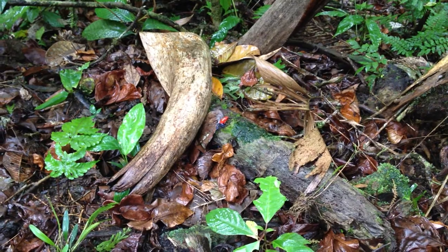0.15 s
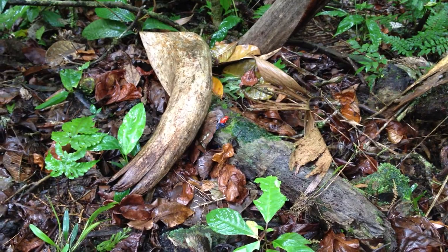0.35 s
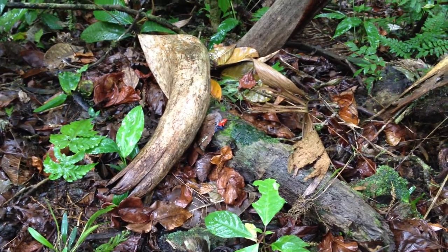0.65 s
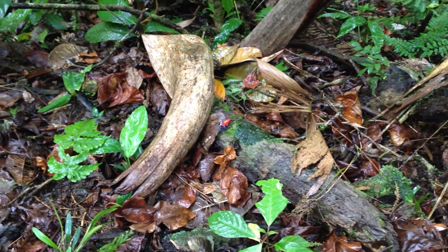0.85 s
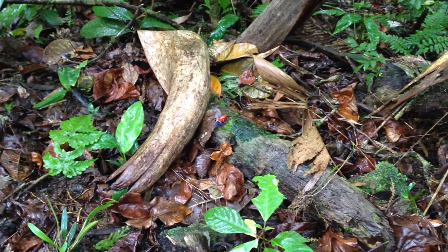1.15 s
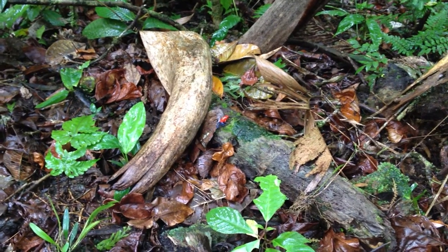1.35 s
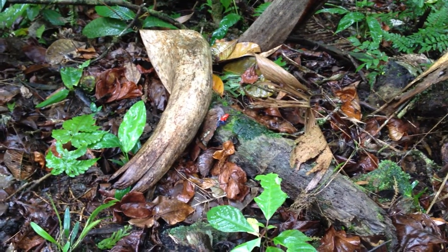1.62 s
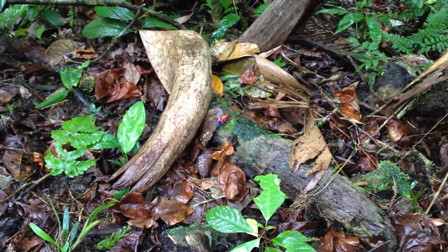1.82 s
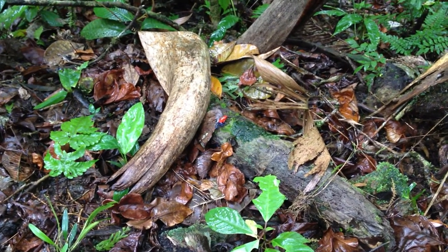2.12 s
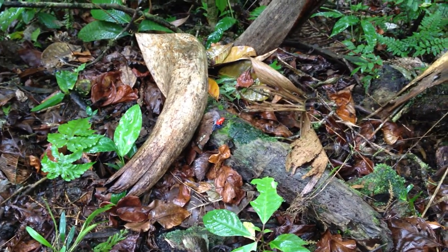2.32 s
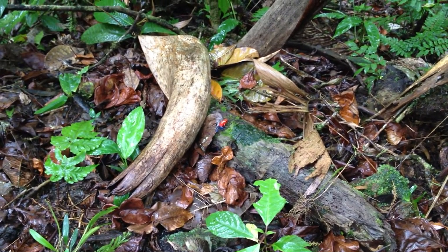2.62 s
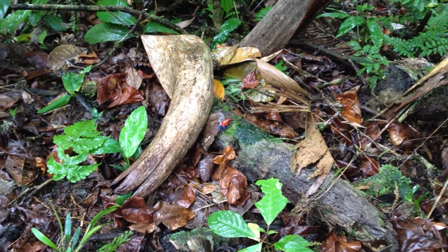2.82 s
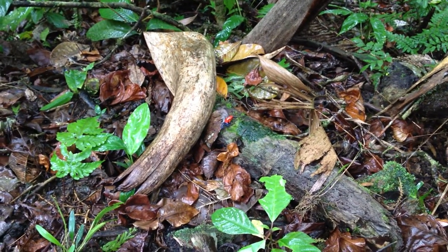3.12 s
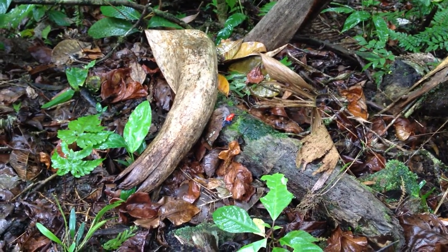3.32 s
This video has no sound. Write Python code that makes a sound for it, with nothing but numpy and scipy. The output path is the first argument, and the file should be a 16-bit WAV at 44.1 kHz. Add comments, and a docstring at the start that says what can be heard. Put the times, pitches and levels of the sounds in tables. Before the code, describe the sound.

A small frog calls in short, high buzzy chirps, about five a second, over watery forest hiss.

```python
"""A small frog calls five times a second from the litter of a wet forest: each call is a swelling
buzz of pulses that ring its vocal sac, coloured by a hollow and followed by diffuse echoes.
Drops tap on near leaves, tick in the litter and pat on soft ground as decaying modes and noise;
fainter drops fall throughout. Shaped noise gives a steady watery hiss and thin insect bands."""
import sys
import numpy as np
from scipy import signal
from scipy.fft import rfft, irfft, next_fast_len
from scipy.io import wavfile
from scipy.ndimage import uniform_filter1d, map_coordinates

SR = 44100
rng = np.random.default_rng(int(sys.argv[2]) if len(sys.argv) > 2 else 0)


def to_wav(sig):
    """Store sig (one row per channel, or 1-D mono) as 16-bit WAV at the path in sys.argv[1].

    Samples outside -1..1 are clipped; the rate is SR.
    """
    pcm = np.clip(np.atleast_2d(sig), -1, 1) * 32767
    pcm = np.round(pcm).astype(np.int16)
    wavfile.write(sys.argv[1], SR, pcm.T)  # frames by channels


N = 152586
TOP_HZ = 15420  # upper limit of the whole sound
DROP_TIME = np.arange(SR // 4) / SR  # seconds since a near drop lands
DRIP_ROOM_DB = -7  # echoes of a near drop, relative to its direct sound
BURST_WIDTH_HZ = 12000  # bandwidth of a droplet's tick and of a leaf's crack


def amp(db):
    """Level law: decibels to amplitude gain."""
    return 10 ** (np.asarray(db) / 20)


def unit(x):
    """Power normalisation: scaled to rms 1."""
    return x / np.sqrt(np.mean(x ** 2) + 1e-20)


def along(points, hz):
    """Spectral envelope: (Hz, value) points joined along a logarithmic frequency axis."""
    f, v = np.transpose(points)
    return np.interp(np.log(hz + 1), np.log(f + 1), v)


def filtered(x, response):
    """Linear filtering: the spectrum of x times a complex response of frequency."""
    m = next_fast_len(len(x) + SR // 10)
    hz = np.fft.rfftfreq(m, 1 / SR)
    return irfft(rfft(x, m) * response(hz), m)[:len(x)]


def resonance(f, hz, width):
    """Damped oscillator: response of one causal resonance, 1 at its peak."""
    return 1j * f * width / (hz * hz - f * f + 1j * f * width)


def resonances(f, modes):
    """Modal superposition: resonances (Hz, width Hz, dB) sum in parallel."""
    return sum(amp(db) * resonance(f, hz, width) for hz, width, db in modes)


def band(hz, width, size):
    """Narrow-band noise: rms 1, through two equal resonances in cascade for steep skirts."""
    noise = rng.standard_normal(size)
    return unit(filtered(noise, lambda f: resonance(f, hz, width * np.sqrt(2)) ** 2))


def low_cut(x, hz, order=2):
    """High-pass filtering: a causal Butterworth cut of the bass."""
    return signal.sosfilt(signal.butter(order, hz, "highpass", fs=SR, output="sos"), x)


def add(track, s, sound):
    """Linear superposition: mix a sound into the track from time s."""
    i = max(round(s * SR), 0)
    part = track[i:i + len(sound)]
    part += sound[:len(part)]


def echoes(x):
    """Diffuse reverberation: convolution with noise of unit energy, decaying by frequency."""
    # Each row: frequency in Hz, time for a 60 dB decay in seconds.
    forest_decay = [(200, 0.057), (4000, 0.076), (12000, 0.1)]
    hz, t, z = signal.stft(rng.standard_normal(SR // 2), SR, nperseg=256)
    decay = amp(-60 * t / along(forest_decay, hz)[:, None])
    tail = signal.istft(z * decay, SR, nperseg=256)[1]
    return signal.fftconvolve(x, tail / np.linalg.norm(tail))[:len(x)]


def dying(t, t60):
    """Exponential damping: a fall of 60 dB in t60 seconds."""
    return np.exp(-np.log(1000) * t / t60)


def ring(modes, hz):
    """Modal ringing: damped sines (multiple of hz, dB, t60 s), struck together."""
    t = DROP_TIME
    return sum(amp(db) * np.sin(2 * np.pi * k * hz * t) * dying(t, t60) for k, db, t60 in modes)


def later(x, delay):
    """Pure delay: a drop's signal shifted by some seconds."""
    return np.interp(DROP_TIME - delay, DROP_TIME, x, left=0)


def wet(x):
    """Direct and reverberant field: a near drop with its echoes."""
    return x + amp(DRIP_ROOM_DB) * echoes(x)


def hiss(level_db=-49, patchy_db=0.9, waver_db=0.15, waver_rate=7):
    """Distant water as shaped random noise, with slight patches in time and pitch and a slight waver."""
    # Each row: frequency in Hz, relative spectral level in dB.
    water_colour = [(25, -32), (60, -32), (90, -18.5), (125, -7.5), (190, -2), (320, 0.5), (480, -0.5),
                    (900, 1.5), (1700, 0), (2500, -4.5), (3400, -4.5), (4300, -3), (5100, -10.5),
                    (6800, -9.5), (8500, -11.5), (9400, -17), (12500, -16.5), (14000, -21.5),
                    (15400, -24.5)]
    z = signal.stft(rng.standard_normal(N), nperseg=512)[2]
    patches = uniform_filter1d(rng.standard_normal(z.shape), size=7, axis=0)
    patches = uniform_filter1d(patches, size=10, axis=1)
    noise = signal.istft(z * amp(patchy_db * unit(patches)), nperseg=512)[1][:N]
    # waver_rate: random points a second
    waver = map_coordinates(rng.standard_normal(200), [np.arange(N) * waver_rate / SR])
    water = unit(filtered(noise, lambda f: amp(along(water_colour, f))))
    return amp(level_db + waver_db * waver) * water


def insects():
    """Incoherent summation: a far chorus merges into thin steady bands of noise."""
    # Each row: centre in Hz, width in Hz, level in dB.
    chorus_bands = [(5956, 93, -66.5), (6242, 180, -66)]
    return sum(amp(db) * band(hz, width, N) for hz, width, db in chorus_bands)


def far_drops(centre_hz=5000, octaves=0.5, t60=0.01, count=400):
    """Poisson process: faint drops fall at random, each a decaying burst of noise."""
    rate, loudest_db, spread_db = 45, -49.5, 3  # drops a second, level at onset, range below it
    out, t = np.zeros(N), np.arange(SR // 20) / SR
    times = np.cumsum(rng.exponential(1 / rate, count))
    for s, far, colour in zip(times, rng.random(count), rng.standard_normal(count)):
        hz = min(centre_hz * 2 ** (octaves * colour), TOP_HZ)
        drop = band(hz, hz, len(t)) * dying(t, t60)
        add(out, s, amp(loudest_db - spread_db * far) * drop)
    return out


def frog(count=51):
    """Source and filter: swelling, quickening pulses, nearly in step with the sac's ring, excite its modes."""
    # Each row: loudest moment in seconds, level in dB before the common gain,
    # length as a multiple of the usual, ring pitch in Hz that sets the pulse timing.
    calls = [(.126, -44, 1.2, 4060), (.314, -45.5, 1.15, 4130), (.502, -45.5, 1.4, 4116),
             (.695, -45.5, 1.1, 4125), (0.883, -45.5, 1.4, 4055), (1.074, -45, 1.3, 4075),
             (1.258, -44.5, 1.05, 4065), (1.447, -44.5, 0.92, 4065), (1.63, -44, 1.1, 4030),
             (1.819, -44.4, 1.14, 4095), (2.009, -45.3, 1.3, 4130), (2.199, -46.5, 1, 4060),
             (2.384, -45, .8, 4060), (2.57, -44.5, 1.25, 4120), (2.758, -45.5, 1.1, 4137),
             (2.948, -45.6, 1.3, 4044), (3.135, -47, 1.2, 4070), (3.329, -45.5, 1.1, 4070)]
    # Vocal sac resonances. Each row: frequency in Hz, width in Hz, level in dB.
    sac_modes = [(4110, 200, 0), (4610, 170, -18), (3860, 110, -22)]
    # Colour of the voice. Each row: frequency in Hz, gain in dB.
    voice_colour = [(2500, 6.5), (3400, 1.5), (3900, 0), (4650, -0.5), (5100, -8), (6500, 0.5), (8200, -7),
                    (10000, -7)]
    # Hollow in the litter. Each row: frequency in Hz, width in Hz, level over the direct voice in dB.
    hollow_modes = [(3769, 22, 1), (3860, 40, -4), (3940, 20, 0), (4070, 22, -6), (4184, 24, -3),
                    (4238, 20, 1)]
    pulse_hz, pulse_rise_hz_per_s = 272, 900  # rate in mid-call and its quickening
    ring_rise_hz_per_s = 200  # rise of the ring pitch through a call
    drift, uneven = 0.03, 0.04  # share of the rate from call to call, share of the mean spacing
    jitter_s, scatter_db = 0.00004, 1  # spread of pulse timing and size
    swell_s, fade_s, swell_shape, fade_shape = 0.019, 0.016, 1.62, 1.05  # rounded rise, trailing fall
    gain_db, room_db = -4, -5  # common gain, echoes relative to the voice
    lead, early_s = 0.1, 0.004  # seconds of room before the loudest moment, further advance

    def body(f):
        """Sac and hollow act in cascade."""
        sac = amp(along(voice_colour, f)) * resonances(f, sac_modes)
        return sac * (1 + resonances(f, hollow_modes))

    out = np.zeros(N)
    for s, db, length, ring_hz in calls:
        index = np.arange(count) - count // 2 + rng.random() + uneven * rng.standard_normal(count)
        when = index / (pulse_hz * (1 + drift * rng.normal()))
        when = when - pulse_rise_hz_per_s / pulse_hz * when ** 2 / 2
        # pulses move to whole cycles of the rising ring, then jitter
        cycles = np.round(when * ring_hz)
        when = (cycles - ring_rise_hz_per_s * when ** 2 / 2) / ring_hz
        when = when + jitter_s * rng.standard_normal(count)

        rising = when < 0
        span = length * np.where(rising, swell_s, fade_s)
        effort = np.exp(-np.abs(when / span) ** np.where(rising, swell_shape, fade_shape) / 2)
        sizes = effort * amp(scatter_db * rng.standard_normal(count))

        # sinc interpolation places each pulse between samples
        at = (when + lead) * SR
        places = np.round(at).astype(int)[:, None] + np.arange(-8, 9)
        weights = sizes[:, None] * np.sinc(places - at[:, None])
        pulses = np.bincount(np.abs(places).ravel(), weights.ravel(), SR // 2)

        voice = filtered(pulses, body)
        call = unit(voice) + amp(room_db) * unit(echoes(voice))
        strength = np.sqrt(np.sum(call ** 2) / (SR / 10))  # energy as an rms over 0.1 s
        add(out, s - lead - early_s, amp(db + gain_db) * call / strength)
    return out


def litter_ticks():
    """Impulsive excitation: droplets in the litter give short decaying bursts of broad noise."""
    # Each row: start in seconds, onset level in dB before colouring, centre in Hz, 60 dB decay in seconds.
    droplets = [(0.28, -43.5, 7800, 0.03), (.3225, -45, 8000, .015), (.417, -43, 7500, 0.015),
                (0.7255, -43, 7960, 0.023), (1.112, -44, 8000, 0.048), (1.2005, -44, 13000, .025),
                (1.26, -43, 9000, .012), (1.6575, -46, 11000, .025), (1.722, -43, 9000, 0.024),
                (1.894, -46, 12500, 0.059), (2.291, -45, 11000, .025), (2.562, -46, 10600, 0.12),
                (2.696, -47, 8500, .02), (2.848, -40, 10000, 0.0087), (2.881, -39, 8000, .01),
                (3.138, -43, 11000, 0.028), (3.218, -37.5, 11000, 0.011)]
    # Each row: frequency in Hz, gain in dB.
    tick_colour = [(8000, -1.5), (12500, -4), (15400, -5)]
    out, t = np.zeros(N), DROP_TIME
    for s, db, hz, t60 in droplets:
        noise = band(hz, BURST_WIDTH_HZ, len(t))
        tick = filtered(noise, lambda f: amp(along(tick_colour, f)))
        add(out, s, amp(db) * wet(tick * dying(t, t60)))
    return out


def ground_pats():
    """Damped impact: drops on soft ground give noise, a low thump and the knock of a sodden leaf."""
    # Each row: start in seconds, level in dB, centre in Hz, 60 dB decay in seconds, relative thump level
    # in dB, attack time constant and knock delay in seconds, knock level in dB before halving.
    impacts = [(0.4164, -40, 1580, 0.027, -11, 0.00047, -6), (.549, -37, 1300, 0.039, -12, 0.0023, -11),
               (.884, -42, 990, 0.028, -3, 0.0021, 1), (1.111, -36, 2200, 0.039, -13, 0.0042, -2),
               (1.294, -39, 1370, .04, -29, 0.00306, -4), (1.52, -37, 1680, .043, -23, 0.0035, -13),
               (1.66, -40.5, 1300, 0.045, -10, 0.0012, 1), (1.843, -35.5, 1180, 0.044, -0.5, .0043, -10),
               (2.266, -35, 1570, 0.047, -17, .0046, -4), (2.37, -34, 1240, 0.037, -10, .0036, -3),
               (3.133, -36.5, 1295, 0.041, -1, .0042, 5.5)]
    # Sodden leaf. Each row: multiple of the pat's centre, level in dB, 60 dB decay in seconds.
    knock_modes = [(.73, -1.5, .035), (1, -5.5, 0.044)]
    width_hz, thump_hz, thump_width_hz = 1840, 246, 124
    soft_ground = signal.butter(2, 4200, fs=SR, output="sos")  # swallows the treble, cutoff in Hz
    out, t = np.zeros(N), DROP_TIME
    for s, db, hz, t60, thump_db, attack, knock_db in impacts:
        thump = amp(thump_db) * band(thump_hz, thump_width_hz, len(t))
        blow = band(hz, width_hz, len(t)) + thump
        blow = blow * dying(t, t60) * (1 - np.exp(-t / attack))
        knock = amp(knock_db) * later(ring(knock_modes, hz), attack) / 2
        add(out, s, amp(db) * wet(signal.sosfilt(soft_ground, blow + knock)))
    return out


def leaf_taps():
    """Struck plate: near drops ring a leaf's modes while the splash and its rebound add noise."""
    # Each row: start in seconds, direct peak in dB, leaf ring in Hz, splash centre in Hz, splash level in dB
    # before quartering, rebound delay in seconds, crack level in dB before halving.
    near_drops = [(.4634, -22.5, 2520, 6960, 7, 0.0012, -15), (0.545, -28.5, 1580, 2760, 11.5, .00055, -20),
                  (2.745, -26, 2440, 7000, 10, 0.00083, -14.5), (2.9047, -30.5, 4430, 8200, -9, 0.00048, 1)]
    # Wet leaf. Each row: multiple of its ring pitch, level in dB, 60 dB decay in seconds.
    leaf_modes = [(.66, -5, 0.0092), (.96, -2, 0.012), (1.24, -7.5, 0.019), (1.66, -17, 0.015)]
    splash_width_hz, splash_t60_s, rebound_db = 1700, 0.008, -2
    leaf_low_hz = 940  # a leaf radiates little below this
    out, t = np.zeros(N), DROP_TIME
    for s, db, leaf_hz, splash_hz, splash_db, rebound, crack_db in near_drops:
        splash = amp(splash_db) * band(splash_hz, splash_width_hz, len(t)) / 2
        crack = amp(crack_db) * band(splash_hz, BURST_WIDTH_HZ, len(t))
        burst = dying(t, splash_t60_s)
        burst = burst + amp(rebound_db) * later(burst, rebound)
        tap = ring(leaf_modes, leaf_hz) + (splash + crack) * burst / 2
        tap = low_cut(tap, leaf_low_hz)
        add(out, s, amp(db) * wet(tap / np.abs(tap).max()))
    return out


def scene():
    """Superposition at one point: all sources add, the drops without their deepest bass."""
    drops = far_drops() + litter_ticks() + ground_pats() + leaf_taps()
    return (hiss() + insects() + frog() + low_cut(drops, hz=134, order=4))[None]


def record(dry):
    """Band limitation: nothing passes at or above the upper limit."""
    return np.array([filtered(channel, lambda f: f < TOP_HZ) for channel in dry])


dry = scene()
out = record(dry)
to_wav(out)
```